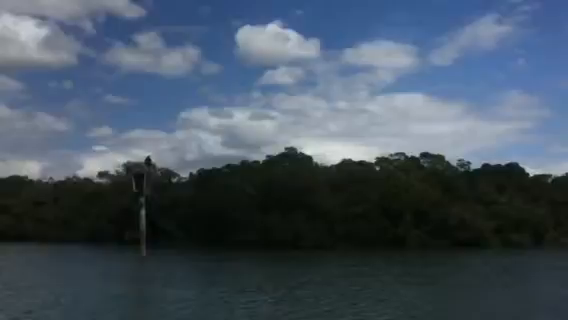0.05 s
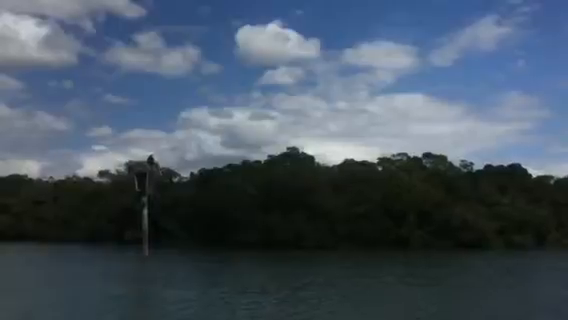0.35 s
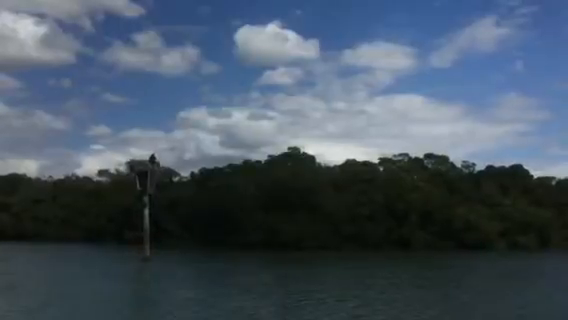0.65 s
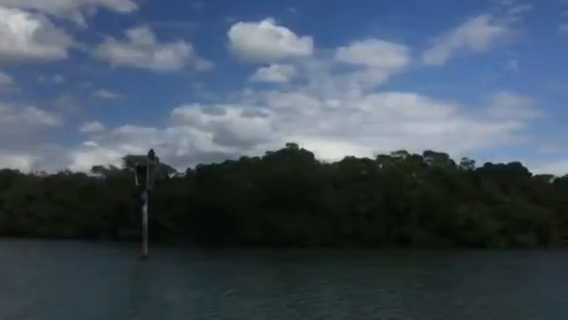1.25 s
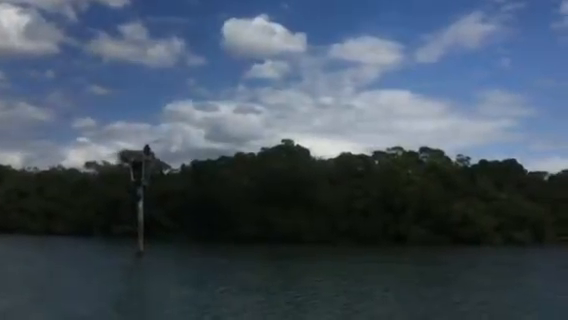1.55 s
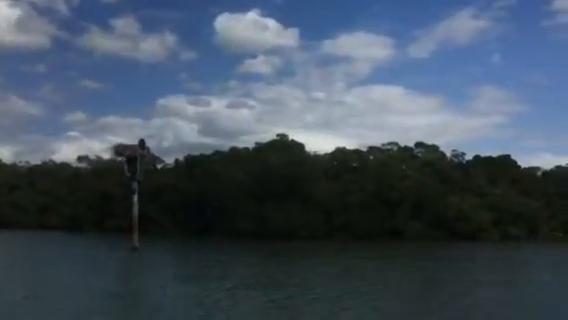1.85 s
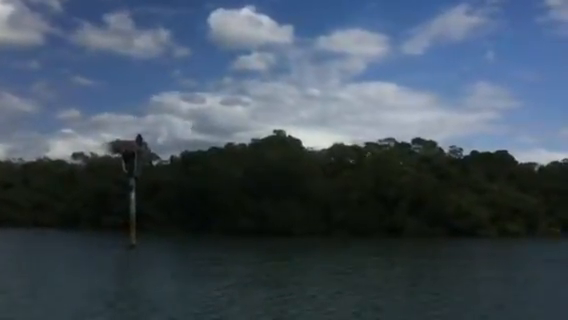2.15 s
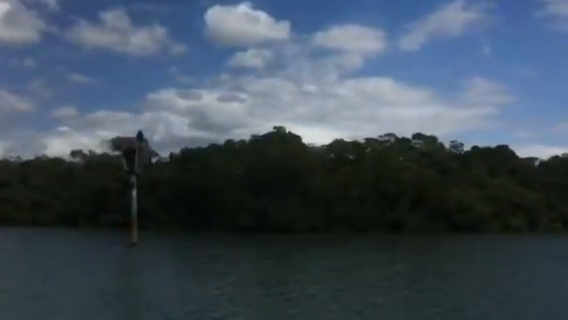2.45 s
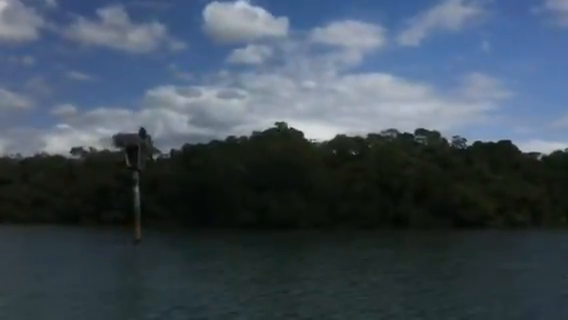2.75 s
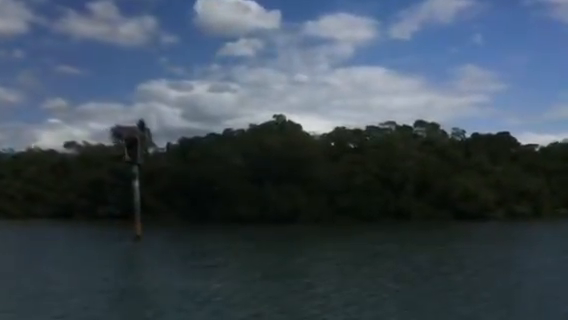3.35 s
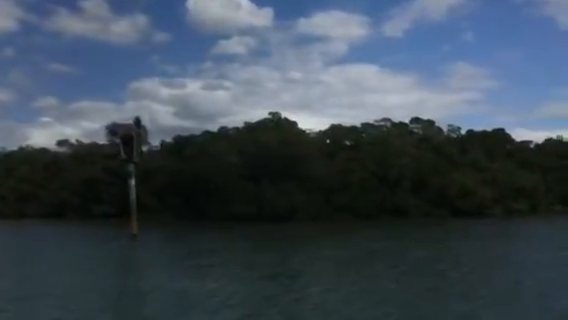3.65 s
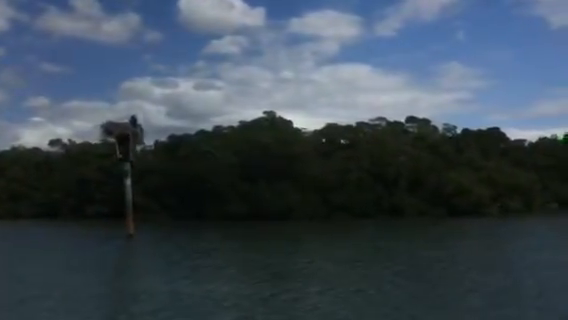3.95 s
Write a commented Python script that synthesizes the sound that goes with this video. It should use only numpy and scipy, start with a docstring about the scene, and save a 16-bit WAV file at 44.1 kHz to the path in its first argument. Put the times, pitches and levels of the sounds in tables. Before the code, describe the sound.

Heard from an idling boat near a wooded shore, a bird gives a quick run of high whistles with a slight echo. Lapping water and small splashes follow over the engine rumble, while the camera faintly buzzes and clicks.

```python
"""A boat engine idles and water laps at the hull, under a camera's faint tick buzz and thin whine.
Almost at once an osprey on a nest pole gives seven arched whistles across the water, most breaking
at the top; the trees behind return them. The camera's mechanism clicks about twice a second.
Drips and bubbles ring as short rising notes, and the water sloshes once among small splashes."""
import sys
import numpy as np
from scipy import signal
from scipy.fft import rfft, irfft, next_fast_len
from scipy.io import wavfile
from scipy.ndimage import map_coordinates

SR = 44100
rng = np.random.default_rng(int(sys.argv[2]) if len(sys.argv) > 2 else 0)


def output_pcm(signal):
    """Save a mono or channel-first signal as 16-bit PCM at the path in sys.argv[1].

    Samples are clipped to [-1, 1] before scaling.
    """
    pcm = np.clip(np.atleast_2d(signal).T, -1, 1) * 32767
    wavfile.write(sys.argv[1], SR, np.round(pcm).astype(np.int16))


N = 176400
TIME_S = np.arange(N) / SR


def amp(db):
    """Decibels to gain."""
    return 10 ** (np.asarray(db) / 20)


def unit(x):
    """Scale to rms 1."""
    return x / np.sqrt(np.mean(x ** 2) + 1e-20)


def along(points, hz):
    """Interpolate (frequency [Hz], value) points on a log axis."""
    knots_hz, values = np.transpose(points)
    return np.interp(np.log(hz + 1), np.log(knots_hz + 1), values)


def wobble(rate_hz):
    """Smooth random curve, rate_hz knots a second."""
    knots = rng.standard_normal(int(N * rate_hz / SR) + 4)
    return map_coordinates(knots, [TIME_S * rate_hz])


def filtered(x, response):
    """Apply the gain response(hz) to x."""
    size = next_fast_len(N + SR // 2)
    return irfft(rfft(x, size) * response(np.fft.rfftfreq(size, 1 / SR)), size)[:N]


def noise(spectrum):
    """Coloured noise, rms 1."""
    return unit(filtered(rng.standard_normal(N), lambda hz: amp(along(spectrum, hz))))


def add(out, start_s, x):
    """Mix x into out."""
    part = out[max(round(start_s * SR), 0):][:len(x)]
    part += x[:len(part)]


def engine(drift=.005, shudder_s=.0004, sway_db=2.4, rumble_db=-42):
    """Shuddering tones on one shared speed, over a rumble; both swell and sink together."""
    # (frequency [Hz], level [dB])
    tones = [(25.1, -68), (50.2, -49.5), (66.5, -51), (75.3, -42), (90, -48.5), (114.5, -52), (125.2, -46),
             (200, -55.5), (228.5, -60), (331, -62.5), (343, -60.5)]
    # (frequency [Hz], relative density [dB])
    rumble = [(15, -12), (35, -15), (50, -10.5), (72, -3), (95, 2.5), (120, -4.5), (145, -7.5), (200, -10),
              (250, -17), (280, -13.5), (310, -19.5), (340, -15), (420, -30.5), (900, -63.5)]
    # (time [s], relative level [dB])
    swell = [(0.0, -42), (0.32, -41.5), (0.369, -39.5), (0.53, -45), (0.56, -42.5), (.93, -42), (1.0, -44),
             (1.079, -42.5), (1.3, -42), (1.9, -40), (2.25, -42), (2.5, -40), (2.58, -45), (2.76, -39.5),
             (2.81, -49.5), (2.83, -40), (3.28, -42.5), (3.46, -39.5), (3.63, -42), (4.0, -42)]
    run_s = np.cumsum(1 + drift * wobble(4)) / SR
    hum = np.zeros(N)
    for hz, db in tones:
        sway = amp(sway_db * wobble(9))
        cycles = hz * (run_s + shudder_s * wobble(22)) + rng.random()
        hum += amp(db) * unit(sway * np.sin(2 * np.pi * cycles))
    swell_db = np.interp(TIME_S, *np.transpose(swell))
    return amp(swell_db - swell_db.mean()) * (hum + amp(rumble_db) * noise(rumble))


def wash(level_db=-55.5, lap_db=1.7, lap_rate_hz=45, bands_hz=(400, 700, 1200, 2000, 3500)):
    """Wavelets lap at the hull; each band swells on its own."""
    # (frequency [Hz], relative density [dB])
    spectrum = [(150, -20), (300, -4), (400, 1.5), (470, -2.5), (560, -1.5), (625, 4.5), (710, -3.5),
                (830, -2.5), (1020, -6), (1180, -4.5), (1420, -13), (1650, -12), (2100, -16), (2700, -23),
                (3300, -22.5), (4500, -24.5), (7000, -54)]
    water, out = noise(spectrum), np.zeros(N)
    for weights in np.eye(len(bands_hz)):
        band = filtered(water, lambda hz: along(list(zip(bands_hz, weights)), hz))
        out += amp(lap_db * wobble(lap_rate_hz)) * band
    return amp(level_db) * unit(out)


def bubble(hz, decay_cycles, rise=.021):
    """One bubble: a damped note that rises as it dies."""
    age = np.arange(int(5 * decay_cycles / hz * SR)) / SR * hz / decay_cycles  # in decay times
    phase = 2 * np.pi * decay_cycles * age * (1 + rise * age / 2)
    return np.sin(phase) * np.exp(-age) * (1 - np.exp(-6 * age))


def fizz(bubbles_per_s=260, centre_hz=1500, level_db=-62, scatter_db=8, tilt_db=7):
    """Small bubbles at random times, the higher ones fainter."""
    # (time [s], gain [dB])
    swell = [(0, -2), (1.45, -2), (1.8, 0), (2.05, -4), (2.4, 2), (2.9, 1), (3.2, -1), (3.6, 1), (4, 0)]
    out = np.zeros(N)
    for when, pitch, strength in rng.uniform(-.92, 1, (int(bubbles_per_s * N / SR), 3)):
        db = level_db + scatter_db * strength ** 3 - tilt_db * pitch
        add(out, abs(when) * N / SR, amp(db) * bubble(centre_hz * np.exp(1.2 * pitch), decay_cycles=5))
    return amp(np.interp(TIME_S, *np.transpose(swell))) * out


def ring(spectrum, size=2048):
    """Minimum-phase impulse response of the given colour, energy 1."""
    cepstrum = irfft(np.log(amp(along(spectrum, np.fft.rfftfreq(size, 1 / SR)))))
    cepstrum[1:size // 2] *= 2
    cepstrum[size // 2 + 1:] = 0
    impulse = irfft(np.exp(rfft(cepstrum)))
    return impulse / np.linalg.norm(impulse)


def camera_buzz(rate_hz=59.99, tick_db=-39.5, lag_s=.0042, whine_hz=8208, whine_db=-87, hiss_db=-69):
    """Regular ticks ring the camera body, some late; a whine and hiss lie under them."""
    # body resonances (frequency [Hz], relative gain [dB])
    body = [(500, -4), (2000, -10.5), (3300, -5.5), (4600, -8.5), (5100, -1.5), (5450, 5.5), (5900, -1.5),
            (6500, -14.5), (7200, -7.5), (8400, -23), (9600, -12), (10400, -25.5), (11600, -14.5),
            (13000, -20), (14200, -12), (15800, -48)]
    # (frequency [Hz], relative density [dB])
    hiss = [(800, 7.5), (2000, -3), (2850, -22), (3230, 10.5), (3600, -10), (5000, -2.5), (6500, -4.5),
            (8500, -9), (9700, -10), (10400, -17), (12000, -8.5), (15500, -15)]
    count = round(N / SR * rate_hz)
    index = np.arange(count)
    due_s = .0002 + index / rate_hz
    stray = (rng.random(count) < .12) * (.5 + rng.random(count))
    late = np.where(due_s < 1.2, index % 2, stray)  # every other tick at first, then a random few
    starts_s = due_s + lag_s * late + .00015 * rng.standard_normal(count)
    out, tick = np.zeros(N), ring(body)
    for start_s, db in zip(starts_s, rng.normal(tick_db, 1.2, count)):
        add(out, start_s, amp(db) * tick)
    whine = np.sqrt(2) * np.sin(2 * np.pi * np.cumsum(whine_hz + 12 * wobble(25)) / SR)
    return out + amp(whine_db) * whine + amp(hiss_db) * noise(hiss)


def osprey(edge_hz=2170, fade_s=.01, jitter=.004, flutter_db=1.8, rasp_db=-14, outward_db=-65.5):
    """Arched whistles, most breaking to the octave, louder on the fall. Returns (direct, to trees)."""
    # (start [s], length [s], top pitch [Hz], arch bluntness, rise level [dB], extra on fall [dB],
    #  break position [0-1], break depth [1 = gap, more = blip between two gaps],
    #  2nd harmonic [dB], 3rd harmonic [dB], half-order tones [dB])
    whistles = [(.018, 0.093, 2680, 1.8, -60, 2.7, 0.47, 1.3, -5.5, -34, -32),
                (.229, 0.095, 2650, 1.6, -61.5, 3.3, 0.465, 1.3, 0, -30, -32),
                (0.448, 0.093, 2580, 2.5, -59, 3.1, 0.48, 0.74, -5, -28, -19),
                (.656, 0.095, 2602, 2, -61, 3.2, .48, 1.3, -2, -28, -15),
                (0.865, .1, 2590, 2, -63.5, 3.1, .47, 0.91, -3.5, -21, -10),
                (1.074, .091, 2560, 2.56, -63, 7.1, 0.44, 0.64, -2, -20, -14),
                (1.331, 0.088, 2490, 2.2, -55, 1.6, 0.51, 0.15, -19, -17, -11)]
    direct, outward = np.zeros(N), np.zeros(N)
    waver, flutter, rasp = wobble(350), amp(flutter_db * wobble(160)), amp(rasp_db) * wobble(640)
    for (start_s, length_s, top_hz, blunt, db, fall_db, break_at, depth,
         second_db, third_db, half_db) in whistles:
        t = np.arange(int(length_s * SR)) / SR
        span = round(start_s * SR) + np.arange(len(t))
        progress = t / length_s
        past_break = (progress - break_at) / .165  # in break half-widths
        broken = np.exp(-past_break ** 4)
        falling = (1 + np.tanh(2 * past_break)) / 2
        effort = np.sin(np.pi * progress) ** 2
        arch_hz = top_hz - (top_hz - edge_hz) * np.abs(2 * progress - 1) ** blunt
        hz = arch_hz * (1 + jitter * (1 + broken) * waver[span])
        phase = 2 * np.pi * np.cumsum(hz) / SR
        first = np.sin(phase) * (1 + rasp[span])
        second = amp(second_db) * effort ** 2 * np.sin(2 * phase)
        third = amp(third_db) * np.sqrt(effort) * np.sin(3 * (phase + rasp[span]))
        halves = amp(half_db) * effort * (np.sin(1.5 * phase) + np.sin(3.5 * phase) / 6)
        odd = (1 - depth * broken) * amp(fall_db * falling) * (first + third)
        fade = np.minimum(1, np.minimum(t, length_s - t) / fade_s)
        add(direct, start_s, np.sqrt(2) * amp(db) * fade * flutter[span] * (odd + second + halves))
        dulled = np.sin(phase) + amp(-4) * second
        add(outward, start_s, np.sqrt(2) * amp(outward_db) * effort * dulled)
    return direct, outward


def trees(call, delay_s=.04, rise_s=.05, t60_s=.6, smear_rad=.9):
    """Diffuse echo off the trees; moving leaves smear its pitch."""
    t = np.arange(SR) / SR
    tail = rng.standard_normal(SR) * np.clip((t - delay_s) / rise_s, 0, 1) * amp(-60 * t / t60_s)
    echo = signal.fftconvolve(call, tail / np.linalg.norm(tail))[:N]
    return np.real(signal.hilbert(echo) * np.exp(1j * smear_rad * wobble(130)))


def camera_clicks(rub_s=.0011, scrape_db=-25, scrape_t60_s=.013):
    """Dry clicks: the mechanism rubs briefly, then its ring dies."""
    # (time [s], level [dB])
    clicks = [(0.089, -34.5), (.5325, -34), (1.0915, -34.5), (1.537, -34), (2.096, -34.5), (2.5407, -36),
              (3.1002, -35), (3.4982, -34.5)]
    # (frequency [Hz], relative level [dB], t60 [s])
    modes = [(2060, -13, 0.002), (2800, -18, .0025), (3350, -22, 0.0038), (4100, -20, 0.0046),
             (5380, -12.5, 0.0063), (5840, -13, 0.004), (7750, -27, .004), (9900, -34, .003),
             (12200, -32, .0033), (12950, -25, .0036), (14400, -28, .003)]
    out, t = np.zeros(N), TIME_S[:SR // 20]
    free_s = np.maximum(t - rub_s, 0)
    for start_s, db in clicks:
        ringing = np.zeros(len(t))
        for hz, mode_db, t60_s in modes:
            envelope = amp(rng.normal(mode_db, 1) - 60 * free_s / t60_s)
            ringing += envelope * np.sin(2 * np.pi * (hz * t + rng.random()))
        scrape = amp(scrape_db - 60 * free_s / scrape_t60_s) * rng.standard_normal(len(t))
        add(out, start_s, amp(db) * (ringing + scrape))
    return out


def spray(centre_hz, log_width, size=16384):
    """Band of noise, rms 1."""
    hz = np.fft.rfftfreq(size, 1 / SR)
    band = np.exp(-(np.log((hz + 1) / centre_hz) / log_width) ** 2)
    return unit(irfft(rfft(rng.standard_normal(size)) * band))


def drips(spray_db=-13, spray_decay_s=.009):
    """Drips and gurgles: each rings a bubble and throws a little spray."""
    # (time [s], pitch [Hz], level [dB])
    drops = [(.335, 1980, -58), (.452, 2000, -56), (1.262, 1215, -46), (1.279, 5540, -53),
             (1.441, 1210, -50.5), (1.789, 1510, -52), (2.219, 3240, -58), (2.443, 3500, -53.5),
             (2.564, 3120, -51.5), (2.648, 2730, -52), (2.794, 1660, -51), (2.829, 3130, -54),
             (2.836, 1335, -53), (2.939, 2050, -56.5), (2.988, 3120, -56), (3.004, 2280, -56),
             (3.131, 3090, -48.5), (3.283, 1133, -47), (3.442, 1350, -49), (3.670, 3720, -50.5),
             (3.791, 1266, -50.5), (3.792, 3200, -50), (3.906, 1860, -48.5), (3.965, 1910, -51)]
    out = np.zeros(N)
    for start_s, hz, db in drops:
        burst = spray(hz, log_width=.35)
        add(out, start_s, amp(db) * bubble(hz, decay_cycles=12.6))
        add(out, start_s, amp(db + spray_db) * np.exp(-TIME_S[:len(burst)] / spray_decay_s) * burst)
    return out


def splashes():
    """Bell-shaped bursts of spray; a cluster of longer ones makes the slosh."""
    # (peak time [s], half-length [s], centre [Hz], half-width [ln frequency], level [dB])
    bursts = [(1.396, 0.01, 1060, 0.5, -54), (1.722, 0.032, 490, 0.28, -53.5),
              (1.814, 0.0066, 1140, 0.15, -54.5), (1.817, 0.011, 4180, 0.39, -65.5),
              (1.834, 0.0061, 1220, 0.25, -56), (2.362, 0.0058, 2000, .8, -58.5),
              (2.402, .012, 3180, 0.42, -64.5), (2.443, 0.0033, 990, 0.45, -45.5),
              (2.59, 0.07, 810, 0.66, -52.5), (2.62, 0.026, 960, 0.56, -51), (2.623, 0.037, 420, 0.52, -46),
              (2.748, .018, 890, 0.3, -49.5), (2.799, 0.047, 960, 0.77, -60.5),
              (2.848, 0.031, 950, 0.44, -56), (3.552, .008, 1460, 0.49, -55.5), (3.6, 0.014, 3580, .3, -67),
              (3.67, .012, 3550, 0.16, -64.5), (3.795, .012, 2400, 0.59, -64),
              (3.966, 0.0053, 3600, .45, -65)]
    out = np.zeros(N)
    for peak_s, half_s, hz, log_width, db in bursts:
        burst = spray(hz, log_width)
        middle_s = len(burst) / SR / 2
        envelope = np.exp(-((TIME_S[:len(burst)] - middle_s) / half_s) ** 2)
        add(out, peak_s - middle_s, amp(db) * envelope * burst)
    return out


def scene():
    """Bird, boat, camera and water in one channel."""
    direct, outward = osprey()
    bird = direct + trees(outward)
    return (bird + engine() + camera_clicks() + camera_buzz() + wash() + splashes() + drips() + fizz())[None]


def record(dry, top_hz=16000):
    """Brick-wall low-pass at the camera's band limit."""
    return filtered(dry[0], lambda hz: hz < top_hz)[None]


dry = scene()
out = record(dry)
output_pcm(out)
```